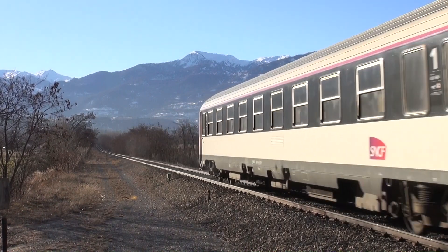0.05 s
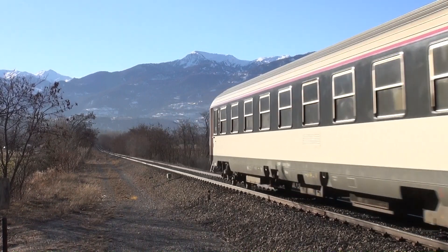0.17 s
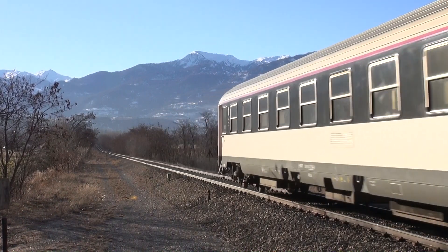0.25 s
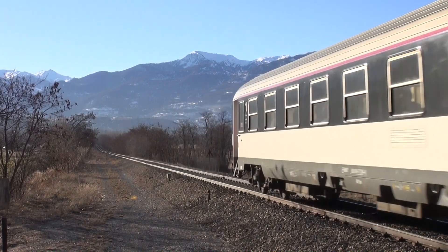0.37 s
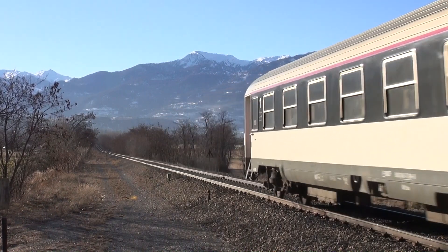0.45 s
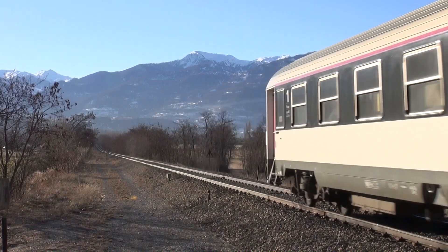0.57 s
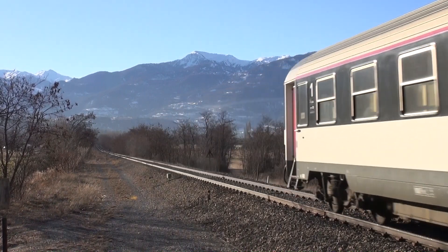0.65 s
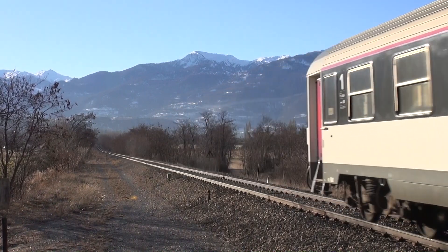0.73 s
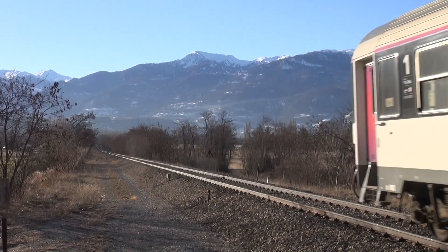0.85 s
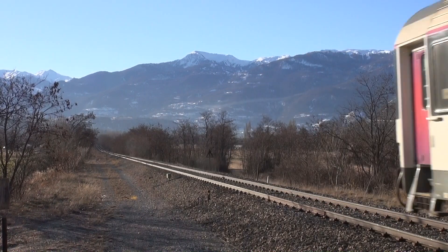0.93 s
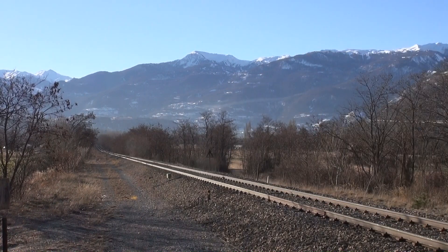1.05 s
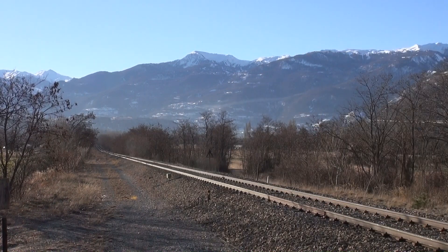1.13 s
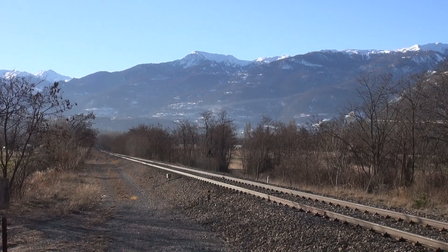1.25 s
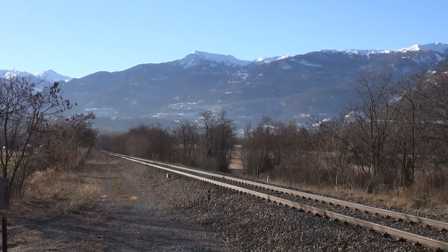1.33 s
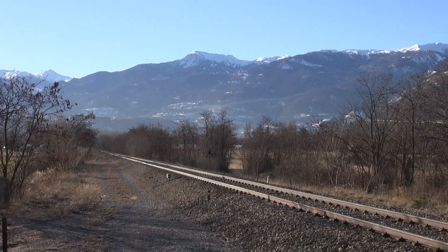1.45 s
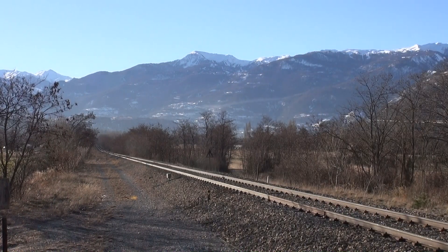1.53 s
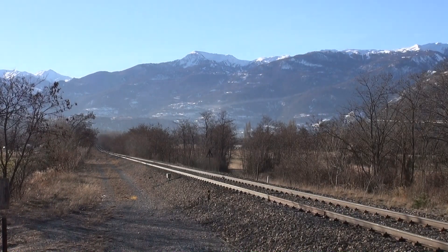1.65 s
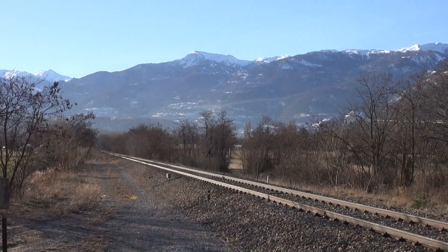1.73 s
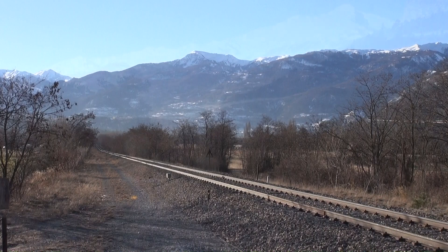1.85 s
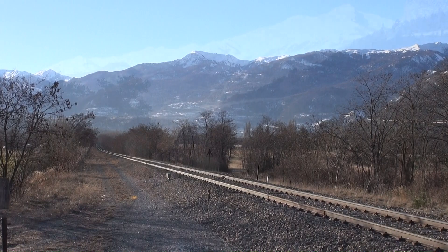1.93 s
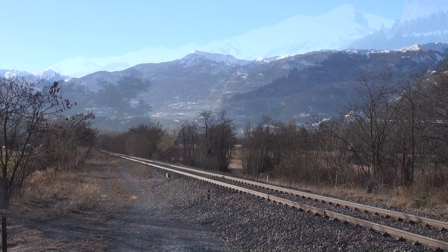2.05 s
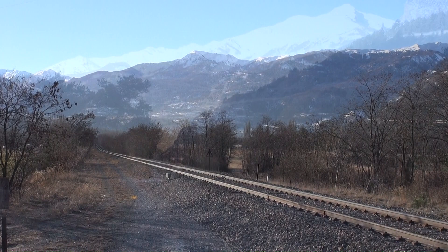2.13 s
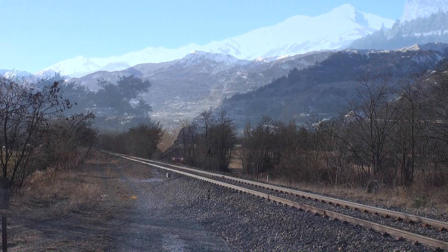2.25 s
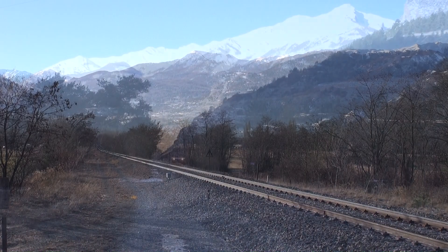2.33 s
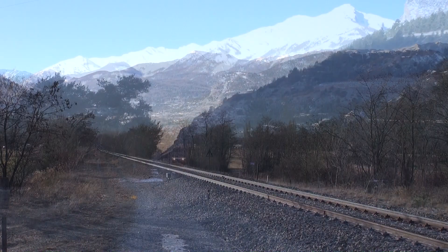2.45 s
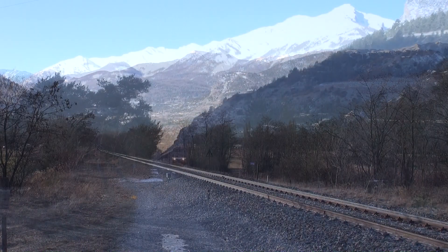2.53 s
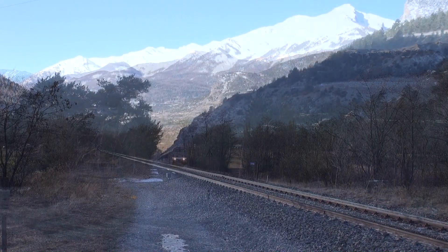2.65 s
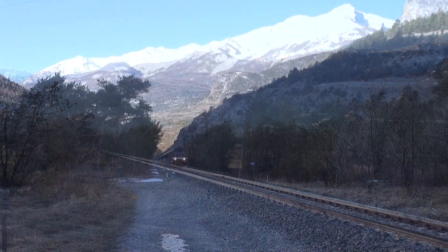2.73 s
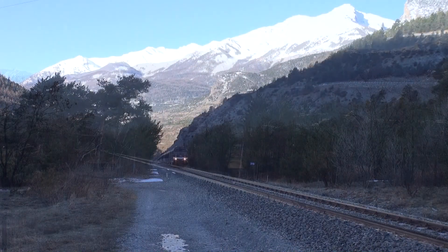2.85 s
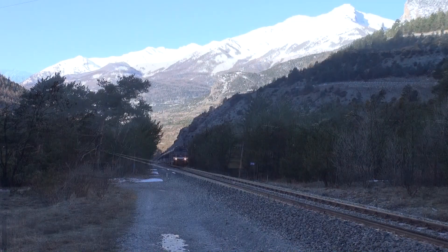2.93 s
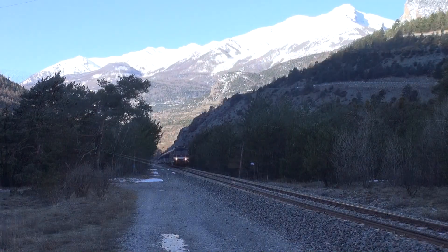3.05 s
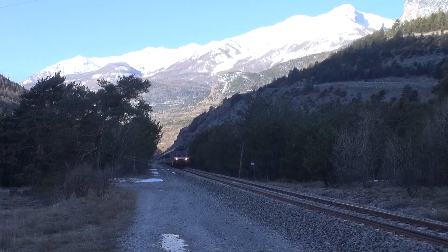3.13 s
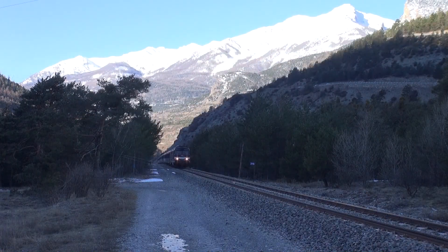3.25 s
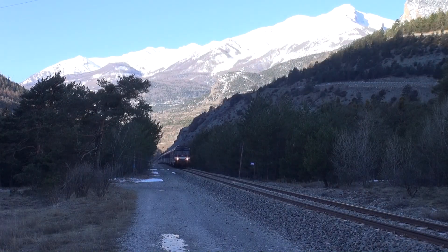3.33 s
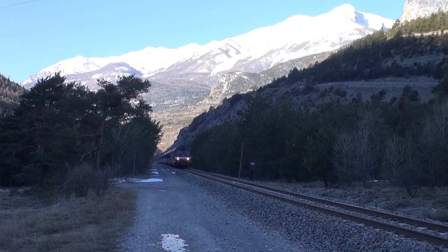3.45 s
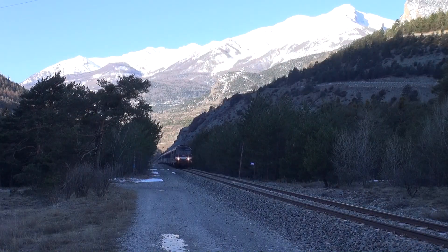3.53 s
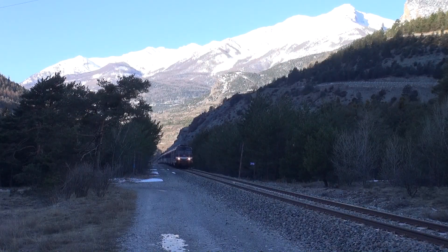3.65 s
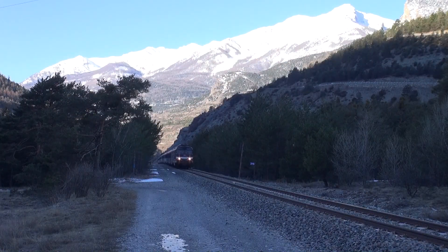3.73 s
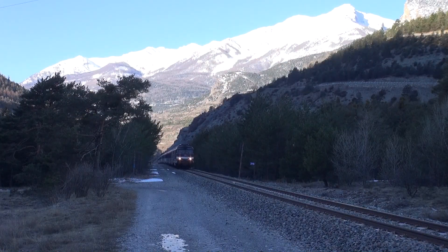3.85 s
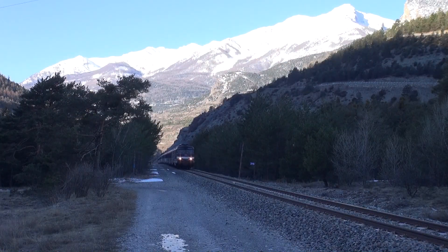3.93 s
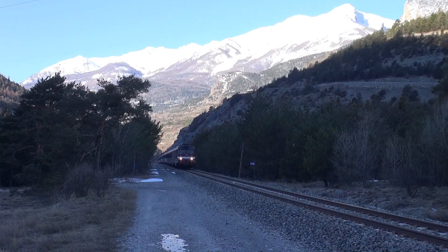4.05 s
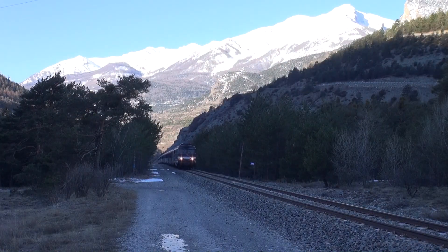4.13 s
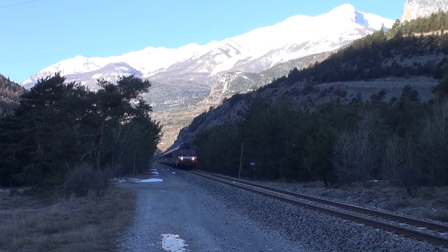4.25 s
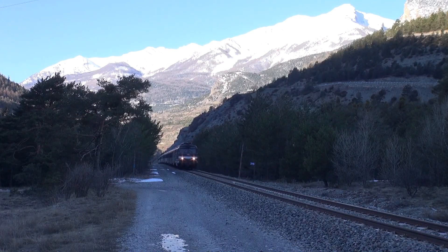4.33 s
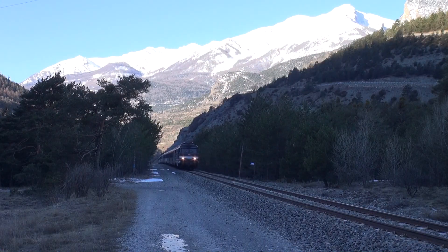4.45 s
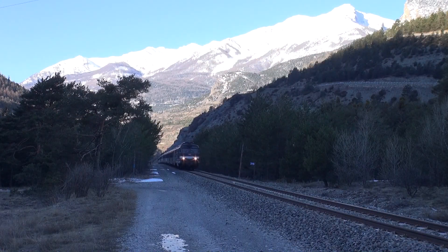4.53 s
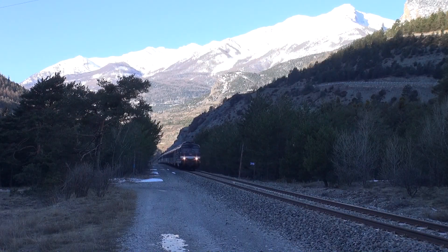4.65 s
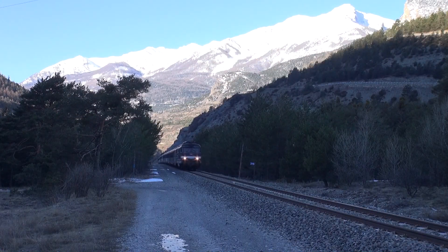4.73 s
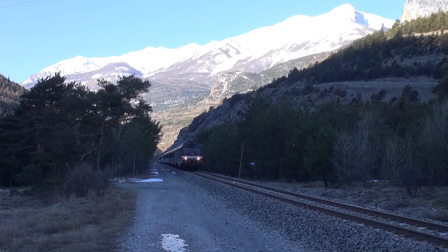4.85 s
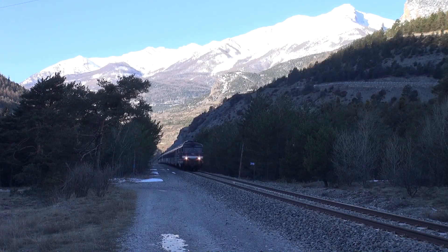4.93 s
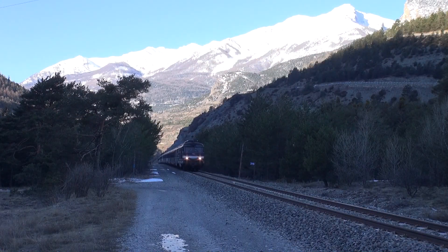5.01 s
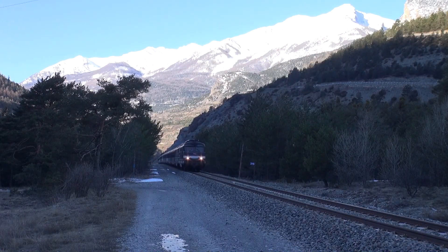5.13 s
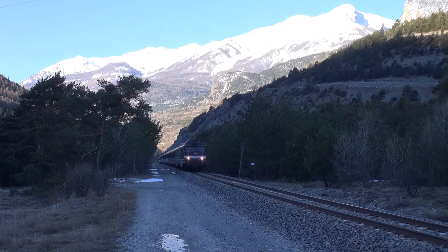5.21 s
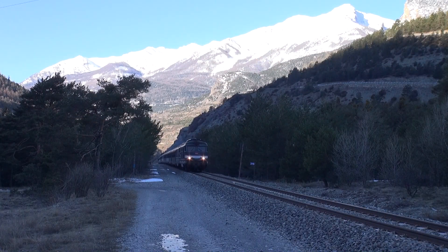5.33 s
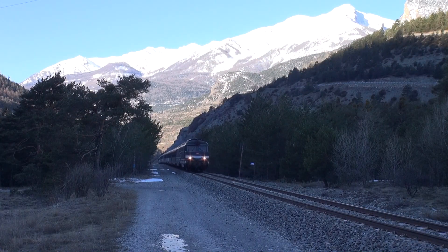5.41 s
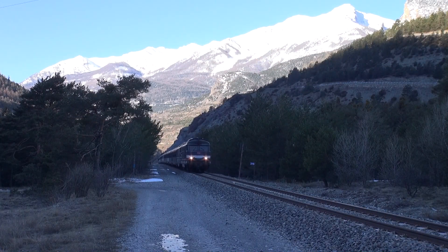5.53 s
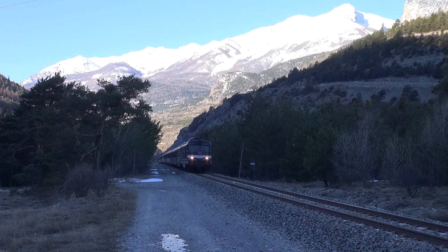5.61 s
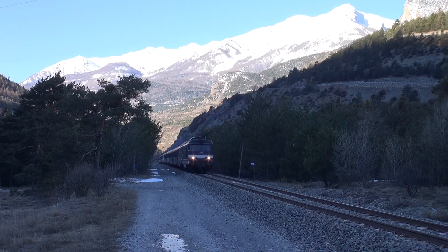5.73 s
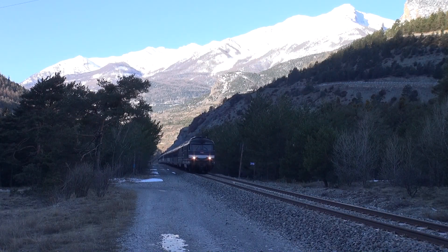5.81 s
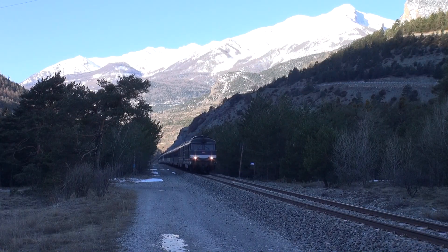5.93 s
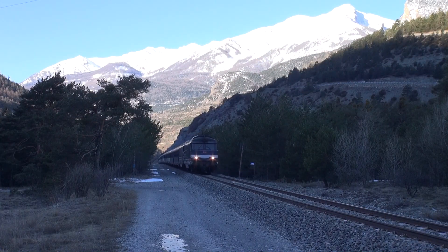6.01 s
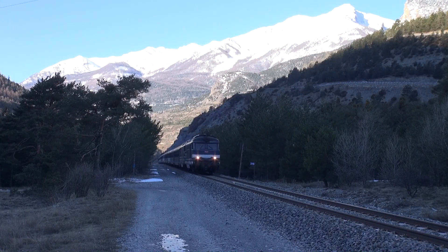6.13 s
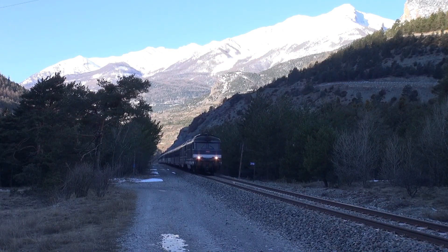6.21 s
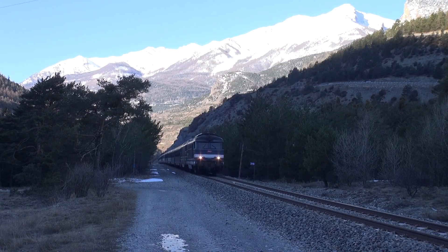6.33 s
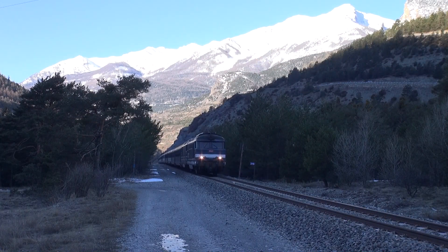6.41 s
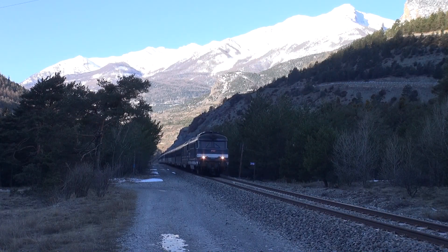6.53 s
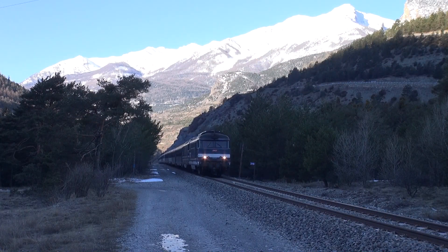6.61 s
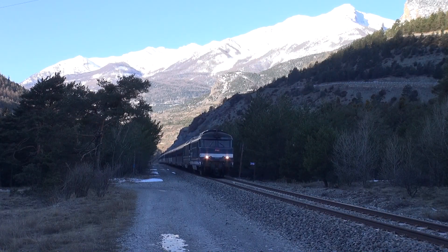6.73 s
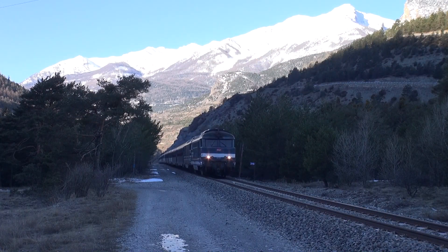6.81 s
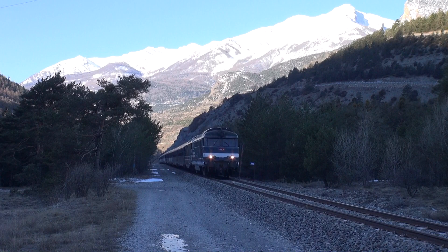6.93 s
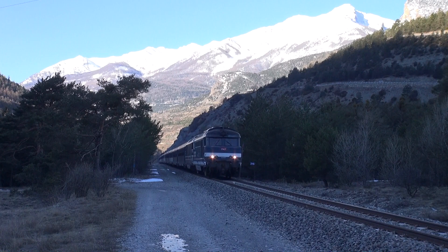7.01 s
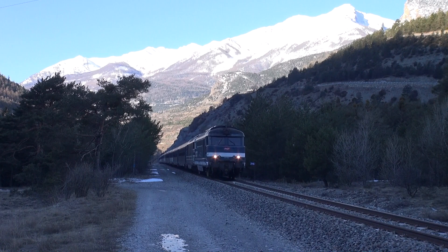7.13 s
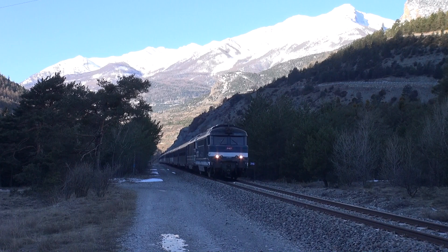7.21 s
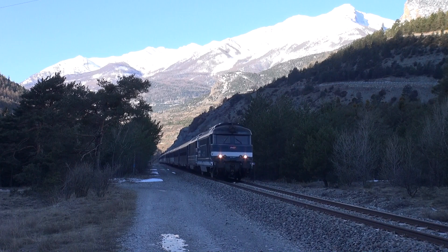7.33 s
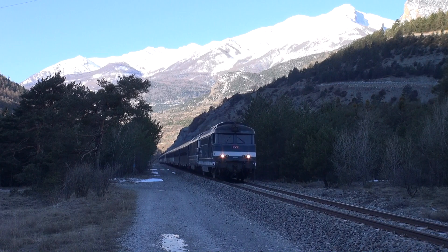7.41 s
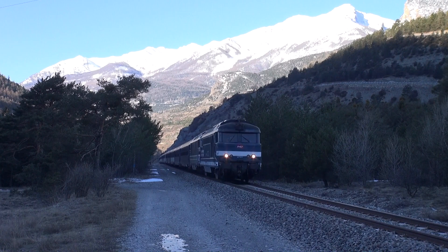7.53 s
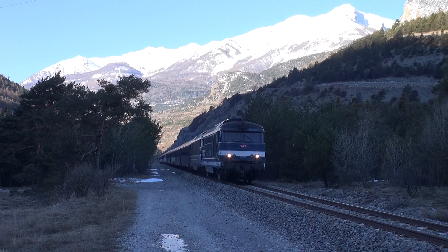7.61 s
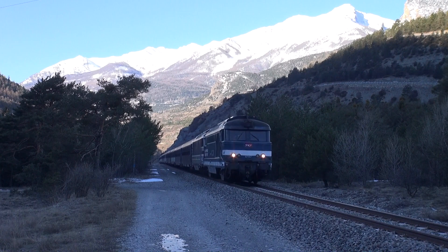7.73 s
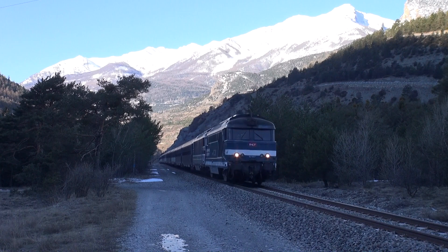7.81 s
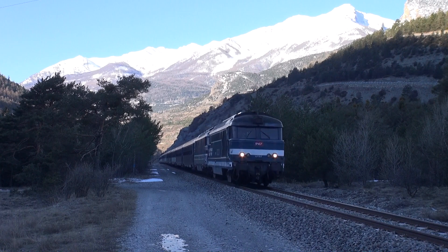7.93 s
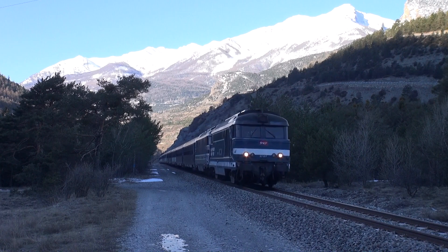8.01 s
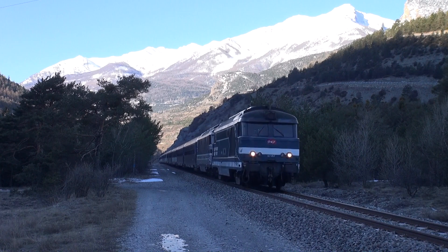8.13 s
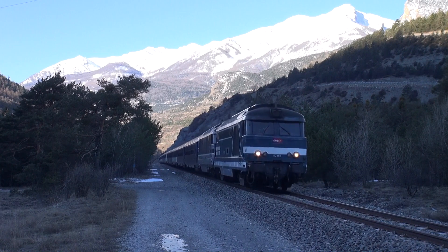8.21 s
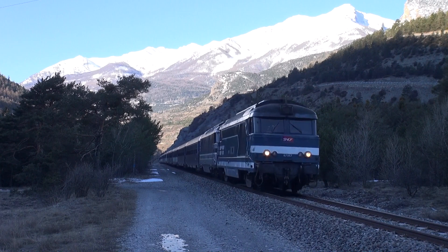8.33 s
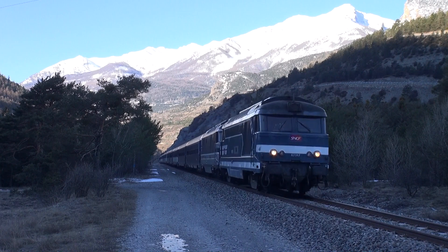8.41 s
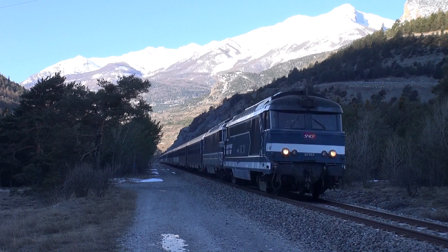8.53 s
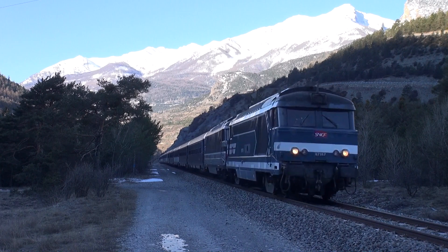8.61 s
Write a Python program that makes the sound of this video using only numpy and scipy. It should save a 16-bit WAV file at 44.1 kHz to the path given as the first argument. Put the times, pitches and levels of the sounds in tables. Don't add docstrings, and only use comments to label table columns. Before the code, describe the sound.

A close stereo pair beside the track catches passing coach wheels, mostly on the right: rough roar, bright rail ringing and small rattles, dropping quickly to a thin wash. A smooth blend brings a distant diesel straight ahead, its low throb growing. Its brassy air horn gives low, low, a quick high note, then a longer low blast. Valley slopes return smeared, slightly flatter echoes while the ducked engine and rolling noise recover and build.

```python
import sys
import numpy as np
from scipy import signal
from scipy.fft import rfft, irfft, next_fast_len
from scipy.io import wavfile
from scipy.ndimage import uniform_filter1d

SR = 44100
rng = np.random.default_rng(int(sys.argv[2]) if len(sys.argv) > 2 else 0)


def int16_out(signal):
    q = np.round(np.clip(np.atleast_2d(signal).T, -1, 1) * 32767)
    wavfile.write(sys.argv[1], SR, q.astype(np.int16))


def gain_from_db(level_db):
    decades = np.asarray(level_db, float) / 20
    return 10 ** decades


N = 381906
HZ = np.fft.rfftfreq(1024, 1 / SR)
FRAME_S = np.arange(N // 256 + 2) * 256 / SR

# [from f/Hz, to f/Hz]
COACH_BANDS = [
    (100, 300),
    (330, 560),
    (800, 4500),
    (11000, 15500),
]
# [level between bogies/dB, added by a bogie/dB, lost when gone/dB, later fade/(dB/s)]
COACH_LAYERS = [
    (-27, -0.5, 9.5, 1),
    (-30.5, 13, 12, -0.5),
    (-33, 5, 9, -1.2),
    (-49.5, -1, 8, 2.5),
]
# [f/Hz, level/dB per Hz]
COACH_TONE = [(18, -70), (30, -41), (79, -32.5), (232, -6), (344, -7), (392, -1), (628, -6.5), (839, -4.5),
              (1090, -13), (1890, -25), (2270, -28.5), (2520, -27.5), (2800, -26), (6000, -31),
              (15800, -44.5)]
# [f/Hz, width/Hz, level/dB, flutter/dB]
COACH_RINGS = [(400, 90, 3, 2), (1900, 200, 11.5, 1.5), (2490, 68, 4.5, 1), (3050, 55, -4.5, -3.5),
               (3910, 120, 4.5, 0.5), (6140, 220, 2.5, 0), (11900, 1300, -3.5, 2)]
# [t/s, strength 0-1]
BOGIES = [
    (-.05, .62),
    (.3, .7),
    (1.09, 1.05),
]
# [t/s, added hiss level/dB, length/s]
RATTLES = [(0.425, 3.5, .015), (0.81, 5, 0.028), (1.26, 2, 0.016), (1.37, 0, 0.034), (1.457, 5, 0.05),
           (1.572, 6.5, 0.016), (1.639, 0, 0.024)]
# [t/s, f/Hz, level over the wash/dB, length/s]
FLECKS = [(0.182, 2470, 8.5, .07), (.44, 5850, 11, .015), (.6, 2520, 10, .04), (0.678, 6000, 8, 0.079),
          (.81, 5900, 9, .025), (1.244, 2490, 12.5, .07), (1.25, 3050, 7.5, .07), (1.373, 6000, 11, .015),
          (1.5, 5970, 9, .06), (1.65, 5830, 10, .03), (1.89, 2390, 9, 0.09), (1.878, 75, 19, 0.099)]
# [f/Hz, likeness 0-1]
COACH_SAME = [(60, 0.91), (130, 0.98), (290, 0.97), (640, 0.97), (1410, 0.8), (3100, 0.83), (6820, -0.0028),
              (15000, 0.81)]
# [f/Hz, left minus right level/dB]
COACH_LEAN = [(60, -5), (130, -0.5), (290, -13.5), (640, -14.5), (1410, -11), (3100, -8), (6820, 1),
              (15000, 2)]
# [f/Hz, phase/rad]
PORT_LEAD = [(0, 0), (1700, -.7), (4900, -.8), (5600, -2.4), (8100, -4.0), (11000, -3.7)]
BOGIE_RISE_S, BOGIE_FALL_S = .21, .43
GONE_S, GONE_SPREAD_S = 1.95, 0.079
LEAN_BETWEEN, LEAN_BOGIE, LEAN_GONE = 1, 0.69, 0.58
DISSOLVE_FROM_S, DISSOLVE_TO_S = 1.73, 3.38

# [f/Hz, level/dB per Hz]
FAR_TONE = [(18, -65), (30, -27), (71, -4.5), (111, -12), (145, -7), (178, -9), (302, -5.5), (344, -5),
            (402, -9.5), (680, -9.5), (796, -6.5), (1420, -16), (3030, -24.5), (9870, -60.5),
            (15800, -47.5)]
# [f/Hz, level/dB per Hz]
NEAR_TONE = [(18, -66), (30, -29), (95, -22), (145, 3.5), (178, -14), (344, -6), (435, -11.5), (817, -10),
             (2330, -20), (2950, -22), (4860, -36), (6660, -31.5), (9120, -47), (14600, -39), (15800, -65)]
# [f/Hz, width/Hz, level/dB, flutter/dB]
ENGINE_RINGS = [(357, 70, 2, 2.2), (732, 90, 2.5, 1.2), (1050, 170, 0.2, 1.1), (1950, 230, 3.5, 2.4),
                (2980, 200, 1.3, 2.2), (3720, 200, 3.6, 1.2), (6000, 650, 3.2, .7), (13600, 2700, 5, .7)]
# [f/Hz, width/Hz, level/dB, flutter/dB]
WHISTLE = [(10600, 70, 13, 1.5)]
# [f/Hz, likeness 0-1]
AHEAD_SAME = [(60, 0.98), (130, 0.95), (290, 1), (640, 0.98), (1410, 1), (3100, 0.99), (6820, 0.84),
              (15000, 0.24)]
# [f/Hz, left minus right level/dB]
AHEAD_LEAN = [(60, 1.0), (180, 0.73), (550, 0.042), (1650, 0.2), (4970, -0.89), (15000, -1.5)]
# [multiple, level/dB, width/Hz]
EXHAUST_ORDERS = [
    (.5, -11.5, 1.5),
    (1, -.6, .6),
    (1.5, -15, 2.0),
    (.31, -20.5, 4.5),
]
ARRIVES_S, FAR_S, NEAR_S = 10.61, 6.01, 1.5
ROLLING_DB, EXHAUST_DB, EXHAUST_HZ = -27.0, -18.6, 149.7
EXHAUST_STEEPER, ROLLING_STEEPER = 1.45, 1.19
ROLLING_DEEPEST_DB = -11.5
DUCK_DB, DUCK_ATTACK_S, DUCK_RECOVER_S = -16.5, .031, 1.15
ROLLING_DUCKED = 1.02

# [pitch factor, first return t/s, low horn level/dB, high horn level/dB, t60/s, dull above f/Hz]
SLOPES = [
    (0.995, .006, -12.5, -8, 0.6, 18000),
    (0.945, .02, -20, -7.5, 1.6, 4500),
    (.99, .05, -14.5, -8, 2.4, 2000),
    (0.975, .2, -13, -13, 4.9, 1200),
    (.955, 0.091, -17, -10.5, 4.0, 1300),
    (.92, .08, -25, -11, 1.4, 1000),
    (.895, .1, -23, -16, 1.2, 2300),
]
# [f/Hz, level/dB]
SLOPE_TONE = [(200, -12), (350, -6), (680, 7.5), (1050, 0.5), (1400, 6), (2100, -1), (3500, -1.5),
              (8000, -1)]
# [multiple, level/dB]
HIGH_SIDEWAYS = [(1, 5.0), (2, 0.5), (3, -8), (4, -17), (5, -18), (6, -22), (7, -27), (8, -32), (9, -25)]
SMEAR = 0.0105
ECHO_DUCKED = .3

# [start t/s, valve closes t/s, f/Hz, level/dB, pitch error at the start/Hz]
LOW = [
    (4.17, 4.396, 356.3, -16.5, 5),
    (4.481, 4.733, 356.3, -16, -13.5),
    (5.349, 5.753, 355.7, -15.5, 3),
]
# [start t/s, valve closes t/s, f/Hz, level/dB, pitch error at the start/Hz]
HIGH = (4.785, 4.9, 678.5, -27, 7)
# [multiple, level/dB]
LOW_EARLY = [(1, -2), (2, -4.5), (3, 2), (4, -3), (5, -8.5), (6, -6), (7, -7), (8, -14), (9, -23),
             (10, -16.5), (11, -17), (12, -32), (13, -26), (14, -25), (15, -23), (16, -28), (17, -27),
             (18, -29), (19, -32), (20, -34.5), (21, -46), (22, -59), (23, -53), (24, -62)]
# [multiple, level/dB]
LOW_LATE = [(1, -4.5), (2, -7), (3, -2), (4, -10), (5, -10.5), (6, -7.5), (7, -14.5), (8, -18), (9, -18),
            (10, -17.5), (11, -27), (12, -30), (13, -24.5), (14, -40), (15, -37), (16, -25.5), (17, -29),
            (18, -34), (19, -32), (20, -35), (21, -46), (22, -52), (23, -55), (24, -53)]
# [multiple, level/dB]
HIGH_ORDERS = [(1, -1), (2, -0.5), (3, -2.5), (4, -9.5), (5, -13.5), (6, -20), (7, -24), (8, -29), (9, -24),
               (10, -29), (11, -36), (12, -42), (13, -66), (14, -58)]
# [start t/s, length/s, from f/Hz, to f/Hz, level/dB]
SQUEAKS = [
    (5.035, .08, 2005, 2140, -34),
    (5.29, .062, 2055, 2140, -30),
]
# [t/s, level/dB, f/Hz, length/s]
POPS = [
    (4.165, -11, 486, 0.0024),
    (4.1673, -6.5, 1050, 0.0015),
    (5.346, -18, 526, 0.0025),
    (5.347, -13, 894, 0.0022),
]
SETTLE_S, SAG, STEP, CLIMB, STEP_S = 0.029, 0.00599, 0.0267, .018, 0.017
LOW_RELEASE_S, HIGH_RELEASE_S, RELEASE_DB = .085, 0.049, -12.5
OPEN_DULL_DB, HELD_DULL_DB, STEP_DULL_DB, END_DULL_DB = -9.5, -3.5, 0, -36
HIGH_STEP_DULL_DB, HIGH_HELD_DULL_DB = -6, -1
BRIGHT_PER_DB, LOW_USUAL_DB = 2.5, -16.3
TOP_ORDERS_DB = -42

MONO_HZ, CEILING = 11800, 0.45


def evened(x):
    return x / np.sqrt(np.mean(x ** 2) + 1e-20)


def read(points, hz):
    f, value = np.transpose(points)
    return np.interp(np.log(hz + 1), np.log(f + 1), value)


def columns(rows, t):
    s, *rest = np.transpose(rows)
    return [np.interp(t, s, c) for c in rest]


def add(mix, s, sound):
    part = mix[round(s * SR):][:len(sound)]
    part += sound[:len(part)]


def bump(s, wide):
    return np.exp(-((FRAME_S - s) / wide) ** 2)


def drift(count, length, smooth):
    x = rng.standard_normal((length, count))
    size = max(round(smooth), 1)
    return evened(uniform_filter1d(uniform_filter1d(x, size, 0), size, 0)).T


def band_db(field_db, lo, hi):
    inside = (HZ >= lo) & (HZ < hi)
    return 10 * np.log10((gain_from_db(field_db[inside]) ** 2).sum(0) / len(HZ))


def ringing(rings):
    flutter = drift(count=len(rings), length=len(FRAME_S), smooth=9)
    lift = 0
    for (hz, width, db, flutter_db), sway in zip(rings, flutter):
        resonance = 1 + (2 * (HZ[:, None] - hz) / width) ** 2
        lift = lift + gain_from_db(db + flutter_db * sway) ** 2 / resonance
    return 10 * np.log10(1 + lift)


def noise(field_db, same, lean_db, lead, patchy_db):
    hiss = rng.standard_normal((N, 2)).T
    a, b = signal.stft(hiss, nperseg=1024, noverlap=768)[2][:, :, :len(FRAME_S)]
    patches = drift(count=len(HZ), length=len(FRAME_S), smooth=7)
    patches = evened(uniform_filter1d(patches, size=9, axis=0))
    same = np.clip(same, -1, 1)
    left = a * np.exp(1j * lead) * gain_from_db(lean_db / 2)
    right = (same * a + np.sqrt(1 - same ** 2) * b) / gain_from_db(lean_db / 2)
    pair = np.array([left, right]) / ((gain_from_db(lean_db / 2) + gain_from_db(-lean_db / 2)) / 2)
    pair = pair * gain_from_db(field_db + patchy_db * patches)
    out = signal.istft(pair, nperseg=1024, noverlap=768)[1][:, :N]
    return np.pad(out, ((0, 0), (0, N - out.shape[1])))


def spread_db(t):
    return -20 * np.log10(ARRIVES_S - t)


def ducking(t):
    held = []
    for start, closes, *_ in LOW:
        attack = np.clip((t - start) / DUCK_ATTACK_S, 0, 1)
        held.append(attack * np.exp(-np.maximum(t - closes - LOW_RELEASE_S, 0) / DUCK_RECOVER_S))
    return DUCK_DB * np.max(held, axis=0)


def coaches():
    bogie = sum(size * bump(s, np.where(FRAME_S < s, BOGIE_RISE_S, BOGIE_FALL_S)) for s, size in BOGIES)
    gone = (1 + np.tanh((FRAME_S - GONE_S) / GONE_SPREAD_S / 2)) / 2
    since_gone = np.maximum(FRAME_S - GONE_S, 0)
    field = read(COACH_TONE, HZ)[:, None] + ringing(COACH_RINGS)
    steady = np.median(field, 1)[:, None]
    place = np.interp(np.log(HZ + 1), np.log([200, 430, 800, 9000, 11500]), [0, 1, 2, 2, 3])
    for k, (layer, band) in enumerate(zip(COACH_LAYERS, COACH_BANDS)):
        db, bogie_db, lost_db, fade_db = layer
        level = db + bogie_db * bogie - lost_db * gone - fade_db * since_gone
        field += np.maximum(1 - abs(place - k), 0)[:, None] * (level - band_db(steady, *band))
    jolts = sum(db * bump(s, wide) for s, db, wide in RATTLES)
    jolts += 1.3 * drift(count=1, length=len(FRAME_S), smooth=3)[0]
    field += np.clip((HZ[:, None] - 2500) / 3000, 0, 1) * jolts
    for s, hz, db, wide in FLECKS:
        field += db * bump(s, wide) * np.exp(-((HZ[:, None] - hz) / (40 + 0.023 * hz)) ** 2)
    lean = LEAN_BETWEEN + (LEAN_BOGIE - LEAN_BETWEEN) * bogie + (LEAN_GONE - LEAN_BETWEEN) * gone
    lean_db = read(COACH_LEAN, HZ)[:, None] * np.clip(lean, 0, 1.5)
    lead = np.interp(HZ, *np.transpose(PORT_LEAD)) * np.clip((MONO_HZ - HZ) / 2500, 0, 1)
    return noise(field, read(COACH_SAME, HZ)[:, None], lean_db, lead[:, None], patchy_db=1.34)


def rolling():
    near = np.clip(np.log(FAR_S / (ARRIVES_S - FRAME_S)) / np.log(FAR_S / NEAR_S), 0, 1.2)
    field = (1 - near) * read(FAR_TONE, HZ)[:, None] + near * read(NEAR_TONE, HZ)[:, None]
    level = ROLLING_DB - .8 + ROLLING_STEEPER * spread_db(FRAME_S)
    level += np.maximum(ROLLING_DUCKED * ducking(FRAME_S), ROLLING_DEEPEST_DB)
    field += level - band_db(field, lo=180, hi=294.4)
    field += ringing(ENGINE_RINGS)
    field += np.clip(1 - 1.5 * near, 0, 1) * ringing(WHISTLE)
    field += 0.52 * near * drift(count=1, length=len(FRAME_S), smooth=3)[0]
    return noise(field, read(AHEAD_SAME, HZ)[:, None], read(AHEAD_LEAN, HZ)[:, None], lead=0, patchy_db=0.72)


def exhaust():
    t = np.arange(N) / SR
    level = EXHAUST_DB + EXHAUST_STEEPER * spread_db(t) + ducking(t)
    out = np.zeros(N)
    for multiple, order_db, width in EXHAUST_ORDERS:
        slow = drift(count=2, length=len(FRAME_S), smooth=6)
        wander, sway = (np.interp(t, FRAME_S, d) for d in slow)
        turns = multiple * EXHAUST_HZ * t + width * np.cumsum(wander) / SR
        out += gain_from_db(order_db + 0.82 * sway) * np.cos(2 * np.pi * turns)
    return np.sqrt(2) * gain_from_db(level) * out


def slopes(calls):
    start = 4
    size = next_fast_len(N - start * SR)
    t, hz, total = np.arange(int(2.5 * SR)) / SR, np.fft.rfftfreq(size, 1 / SR), 0
    for factor, delay, *horn_db, t60, dull_hz in SLOPES:
        heard = np.zeros(round(2.1 * SR))
        smear = SMEAR * min(40 * abs(1 - factor) + 0.42, 1)
        for s, sound, horn in calls:
            wobble = np.repeat(drift(count=1, length=400, smooth=6)[0], 64)
            place = np.cumsum(factor * (1 + smear * wobble))
            stretched = np.interp(place, np.arange(len(sound)), sound, right=0)
            add(heard, s + delay - start, gain_from_db(horn_db[horn]) * stretched)
        taps = rng.standard_normal((len(t), 2)).T * (rng.random(len(t)) < .05)
        lumps = np.interp(t, FRAME_S, drift(count=1, length=len(FRAME_S), smooth=3)[0])
        tail = (taps[0] + 0.16 * taps[1] * np.array([[1], [-1]])) * gain_from_db(3.5 * lumps - 60 * t / t60)
        tail = tail * np.clip(np.minimum(t / .022, (t[-1] - t) / .6), 0, 1)
        returned = rfft(heard / np.linalg.norm(tail[0]), size) * rfft(tail, size)
        total += returned / (1 + (hz / dull_hz) ** 2)
    back = irfft(total * gain_from_db(read(SLOPE_TONE, hz)), size)
    return np.pad(back, ((0, 0), (start * SR, 0)))[:, :N]


def squeak(s, length, from_hz, to_hz, db):
    t = np.arange(0, length, 1 / SR)
    hz = from_hz + (to_hz - from_hz) * t / length
    tone = np.sin(2 * np.pi * np.cumsum(hz) / SR)
    return s, np.sqrt(2) * gain_from_db(db) * tone * signal.windows.tukey(len(t), .85)


def pop(s, db, hz, length):
    t = np.arange(0, 5 * length, 1 / SR)
    swell = t / length * np.exp(-2 * t / length)
    return s, gain_from_db(db + 8) * swell * 2 * np.sin(2 * np.pi * hz * t)


def valve(start, closes, hz, db, off_hz, release, held_db, step_db):
    held = hz * (1 - SAG)
    rise = hz * release / LOW_RELEASE_S
    return [(start, hz + off_hz, db + min(.5 * off_hz, 0), OPEN_DULL_DB),
            (start + SETTLE_S / 3, hz + off_hz / 2, db, (OPEN_DULL_DB + held_db) / 2),
            (start + SETTLE_S, hz, db, held_db),
            (closes, held, db, min(held_db, step_db + 2.5)),
            (closes + STEP_S, held + STEP * rise, db, step_db),
            (closes + .65 * release, held + (STEP + 0.57 * CLIMB) * rise, db - 2.2, step_db - 6),
            (closes + release, held + (STEP + CLIMB) * rise, db + RELEASE_DB, END_DULL_DB)]


def blast(rows, orders, over_db=0., edge_s=0.0012):
    t = np.arange(rows[0][0], rows[-1][0], 1 / SR)
    hz, db, bright_db = columns(rows, t)
    bright_db = bright_db + BRIGHT_PER_DB * max(rows[2][2] - LOW_USUAL_DB, 0)
    count = int(16100 / hz.max())
    k = np.arange(1, count + 1)[:, None]
    level_db = np.r_[np.transpose(orders)[1], TOP_ORDERS_DB + 2.5 * rng.standard_normal(50)][:count]
    circle = np.log(gain_from_db(np.r_[level_db[0] - 12, level_db, level_db[::-1]]))
    phase = -.7 * signal.hilbert(circle).imag[1:count + 1, None] - 1.5
    slow = drift(count=2 * count, length=len(t) // 256 + 2, smooth=5)
    slow = np.array([np.interp(t - t[0], FRAME_S[:len(r)], r) for r in slow])
    sway, shake = slow.reshape(2, count, -1)
    upper = np.clip((k * rows[1][1] - 1500) / 5000, 0, 1)
    gain = gain_from_db(level_db[:, None] + (.7 + 1.7 * upper) * sway + upper * bright_db)
    angle = 2 * np.pi * k * np.cumsum(hz) / SR + phase + 0.42 * upper * shake
    tone = evened((gain * np.cos(angle)).sum(0))
    air = evened(signal.lfilter([1, -1], np.poly([.85, .75]), rng.standard_normal(len(t))))
    tone += gain_from_db(-29.0 + 0.67 * bright_db) * air
    edges = np.clip(np.minimum((t - t[0]) / edge_s, (t[-1] - t) / .016), 0, 1)
    return t[0], gain_from_db(db + over_db) * tone * edges


def horns():
    calls = []
    for row, orders in zip(LOW, (LOW_EARLY, LOW_EARLY, LOW_LATE)):
        rows = valve(*row, LOW_RELEASE_S, HELD_DULL_DB, STEP_DULL_DB)
        calls.append((*blast(rows, orders), 0))
    high = valve(*HIGH, HIGH_RELEASE_S, HIGH_HELD_DULL_DB, HIGH_STEP_DULL_DB)
    ahead = blast(high, HIGH_ORDERS, over_db=6, edge_s=0.027)
    sideways = blast(high, HIGH_SIDEWAYS, over_db=6.4, edge_s=0.026)
    direct = np.zeros(N)
    for s, sound in [c[:2] for c in calls] + [ahead] + [squeak(*r) for r in SQUEAKS] + [pop(*p) for p in POPS]:
        add(direct, s, sound)
    recovering = gain_from_db(ECHO_DUCKED * (ducking(np.arange(N) / SR) - DUCK_DB))
    returns = slopes(calls + [(*sideways, 1)]) * recovering
    return direct * gain_from_db(np.array([[.3], [-.3]])) + returns


def scene():
    t = np.arange(N) / SR
    turn = np.pi / 2 * np.clip((t - DISSOLVE_FROM_S) / (DISSOLVE_TO_S - DISSOLVE_FROM_S), 0, 1)
    return np.cos(turn) * coaches() + np.sin(turn) * (rolling() + exhaust()) + horns()


def top_cut(x):
    return signal.sosfilt(signal.butter(12, 15970, fs=SR, output="sos"), x)


def record(dry):
    mid, side = dry.mean(0), (dry[0] - dry[1]) / 2
    lowpass = signal.firwin(101, MONO_HZ, fs=SR)
    side = .2 * side + .8 * signal.oaconvolve(side, lowpass, "same")
    held = CEILING * np.tanh(np.array([mid + side, mid - side]) / CEILING)
    mix = signal.sosfilt(signal.butter(2, 38, "high", fs=SR, output="sos"), held)
    return top_cut(mix)


dry = scene()
out = record(dry)
int16_out(out)
```